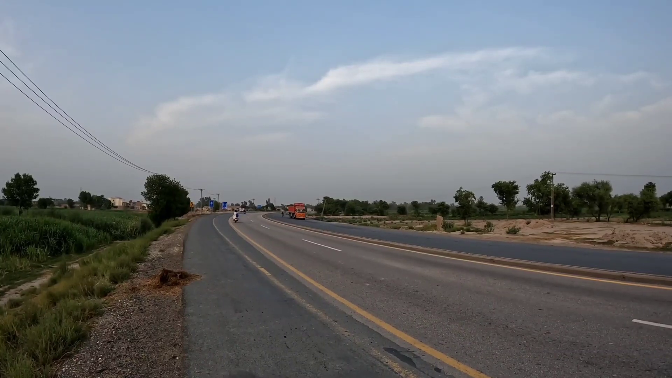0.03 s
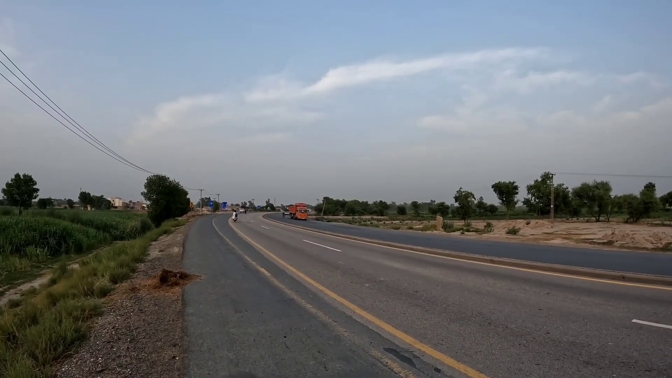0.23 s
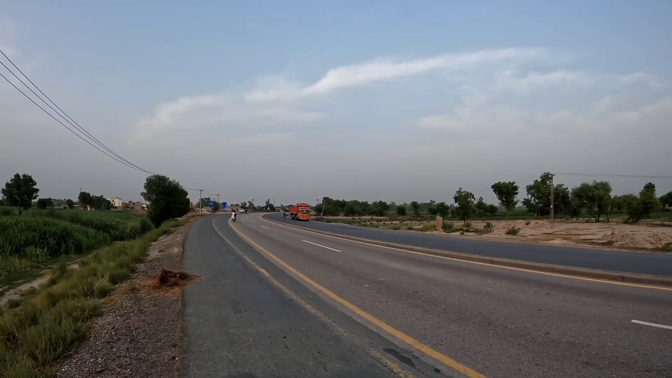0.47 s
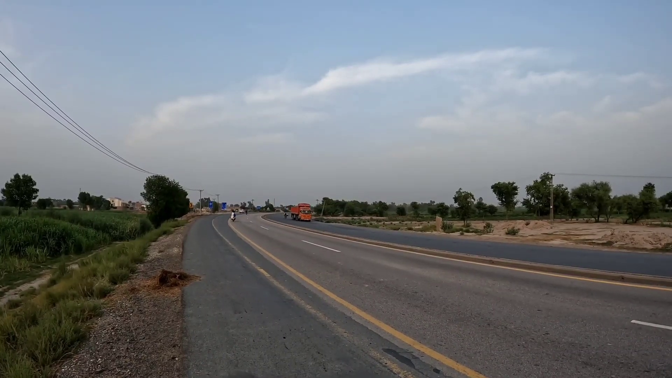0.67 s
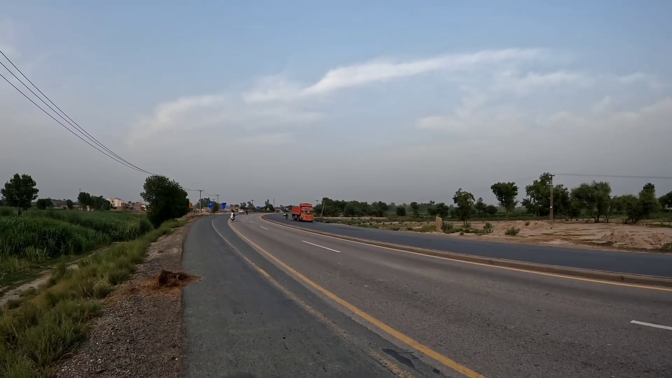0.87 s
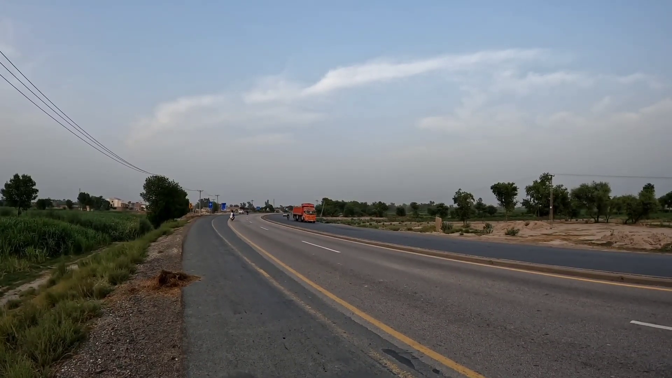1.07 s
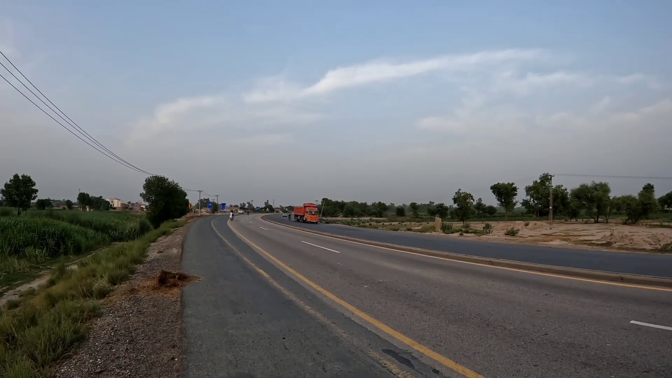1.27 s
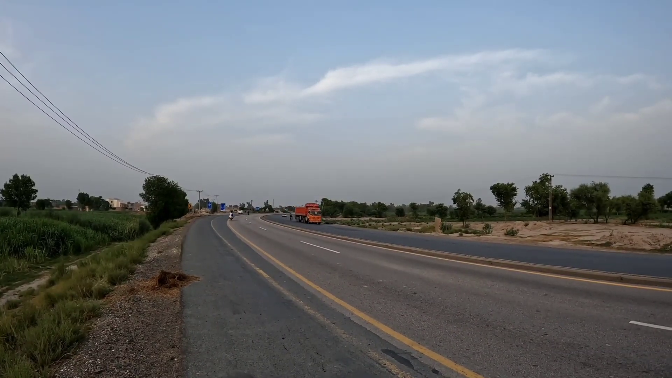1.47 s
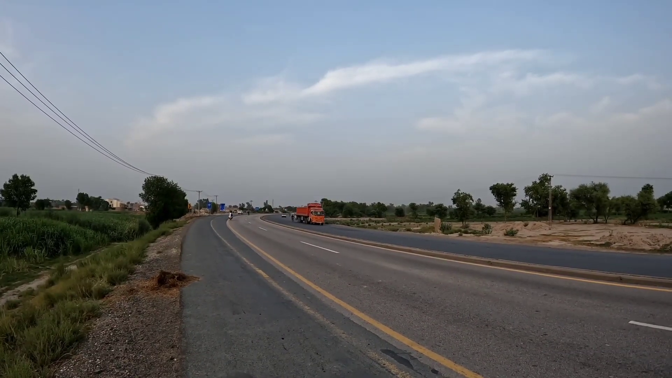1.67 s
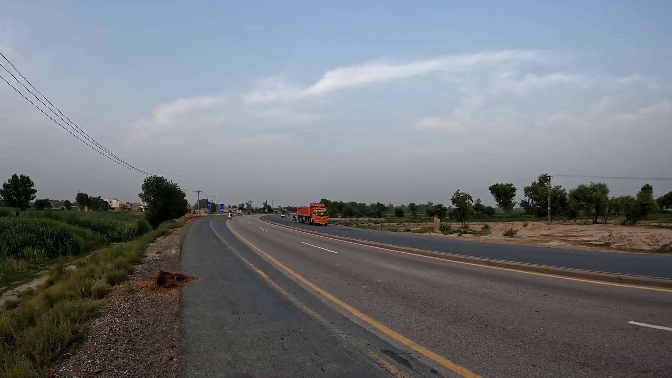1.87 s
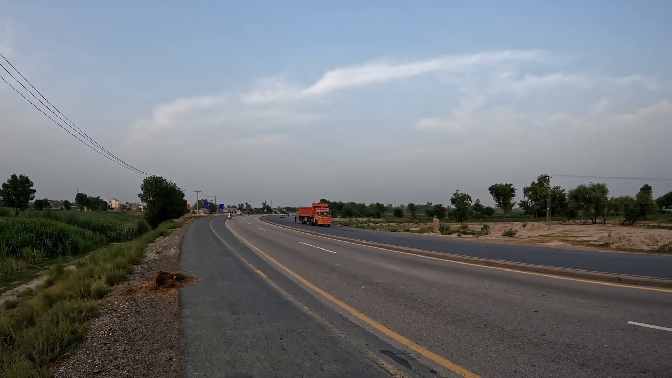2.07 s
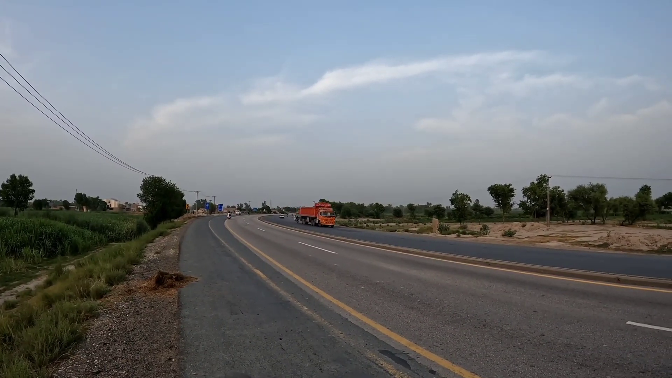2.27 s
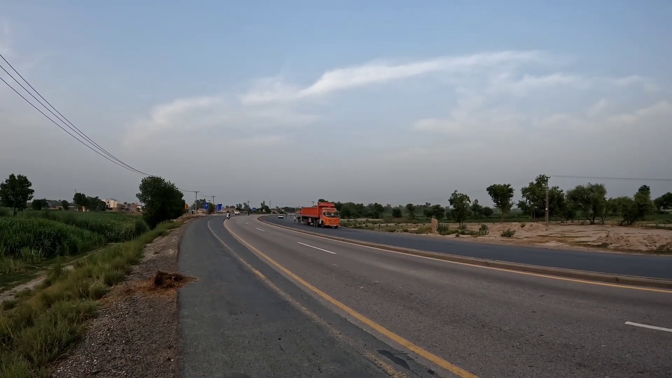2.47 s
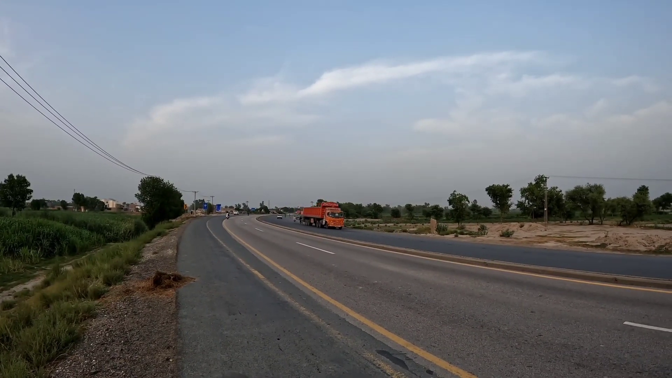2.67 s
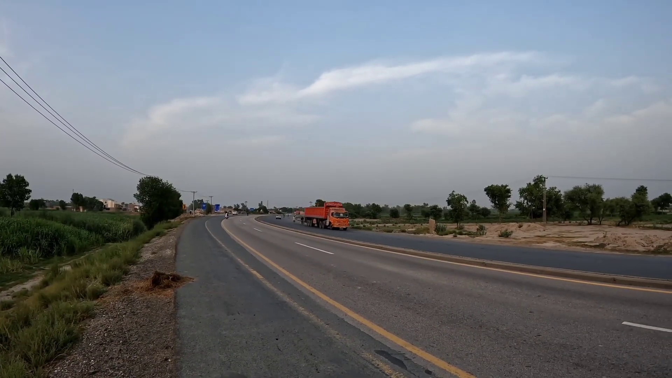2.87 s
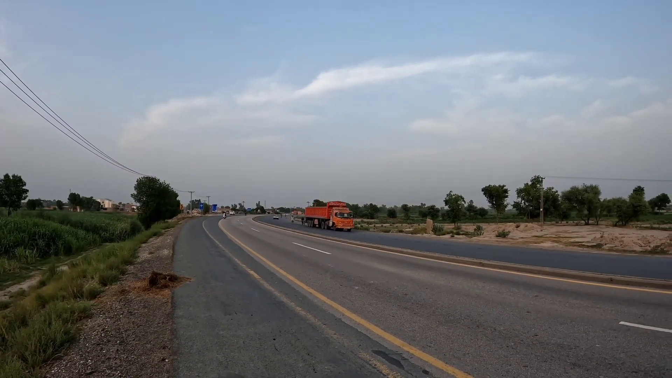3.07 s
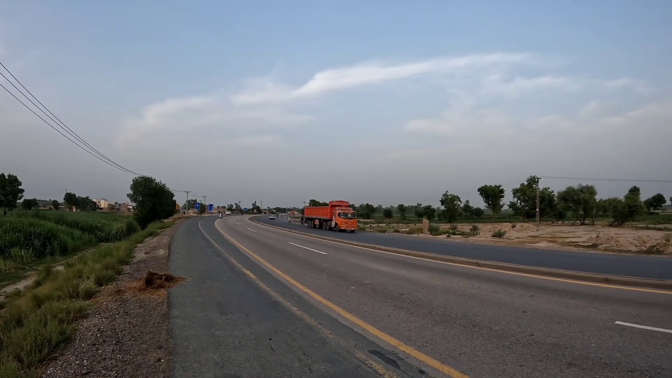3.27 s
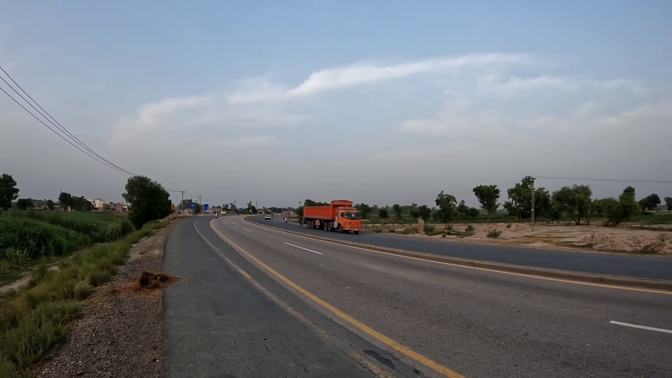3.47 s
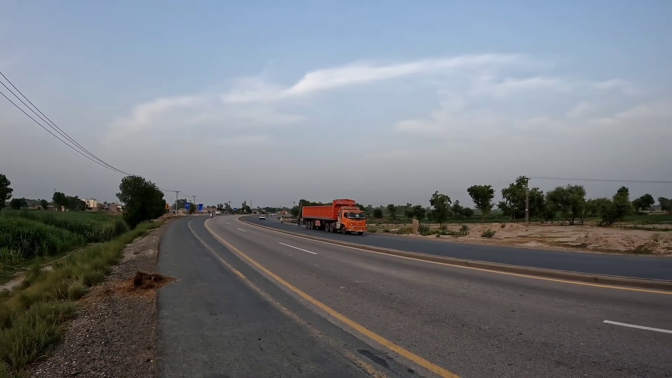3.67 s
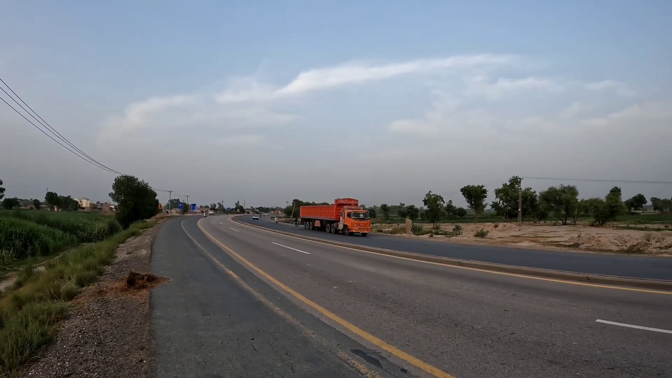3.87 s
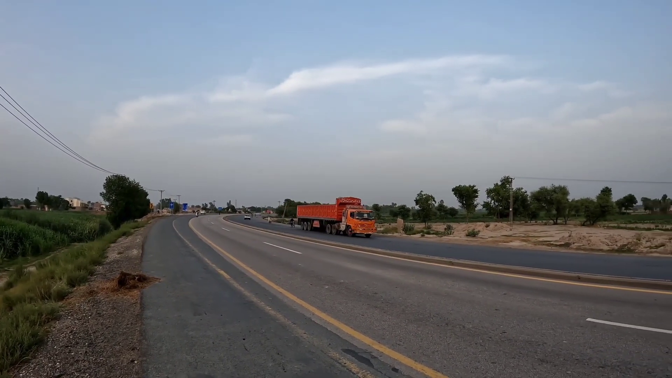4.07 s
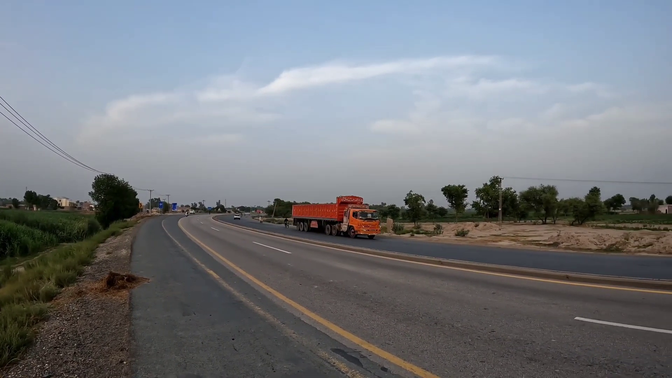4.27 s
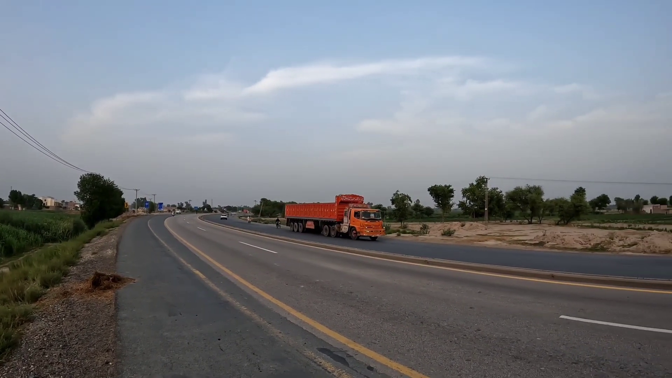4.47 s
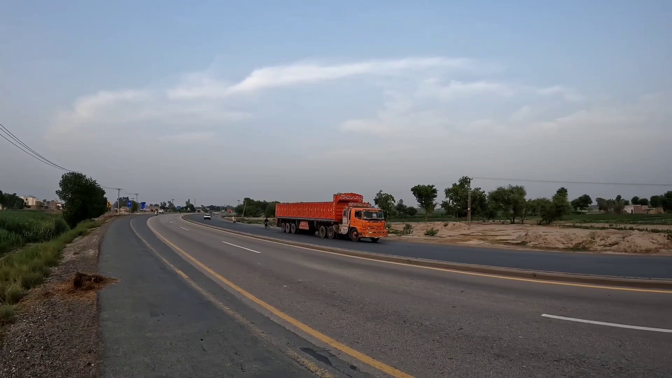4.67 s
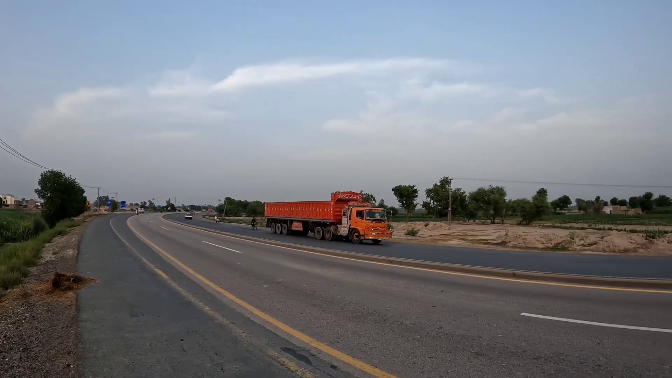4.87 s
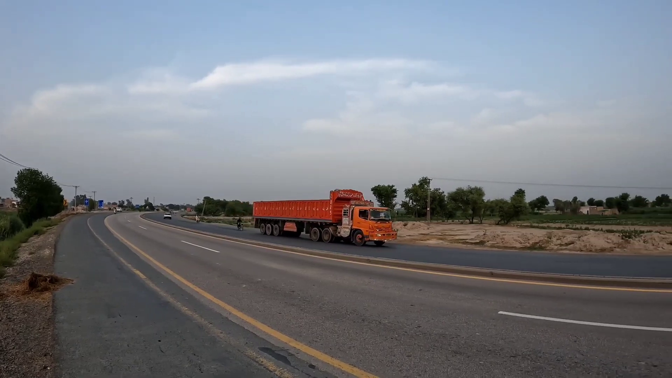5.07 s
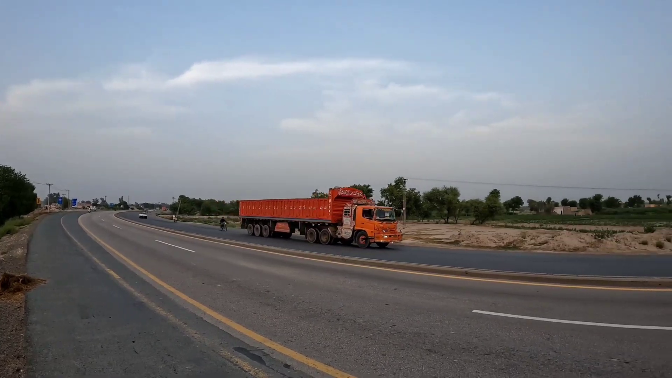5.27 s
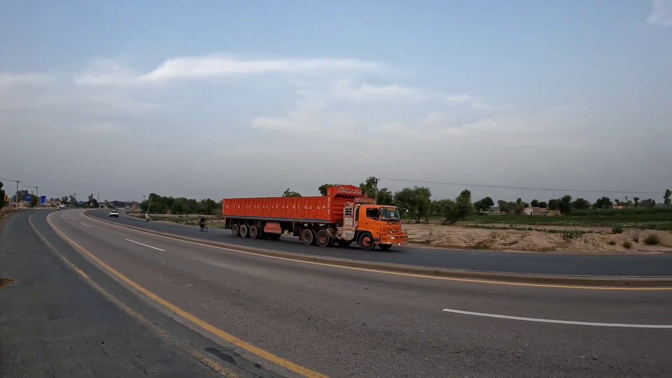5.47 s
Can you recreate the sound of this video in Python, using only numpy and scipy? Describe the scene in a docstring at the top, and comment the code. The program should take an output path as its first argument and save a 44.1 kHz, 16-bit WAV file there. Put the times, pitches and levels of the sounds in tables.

```python
"""A heavy diesel truck with a long trailer approaches on an open highway, heard from the shoulder.
Its exhaust rumbles in sine overtones and coloured noise; its tyres roar louder in grained noise, with a
hiss that swells and ebbs. The hollow trailer drums in narrow noise, its loose steel rattles, clinks
(struck resonances) and squeaks. At first a second engine drones farther off in a few sines, and a
diesel knock ticks in short noise bursts through the noise of distant traffic."""
import sys
import numpy as np
from scipy import signal
from scipy.fft import rfft, irfft, next_fast_len
from scipy.io import wavfile
from scipy.ndimage import uniform_filter1d

SR = 44100
rng = np.random.default_rng(int(sys.argv[2]) if len(sys.argv) > 2 else 0)


def transcribe(signal):
    """Save signal, clipped to [-1, 1], as a 16-bit WAV file at the path in sys.argv[1]."""
    frames = np.atleast_2d(signal).T
    limited = np.clip(frames, -1, 1)
    pcm = np.round(limited * 32767).astype(np.int16)
    wavfile.write(sys.argv[1], SR, pcm)


N = 243873  # length in samples

# Near engine. Exhaust opening up as the truck rounds the bend: time_s, rumble_db (before trim)
EXHAUST = [(0, -31.5), (.6, -33), (1.7, -30.5), (1.95, -26.5), (2.85, -26.5), (3.7, -24), (4.3, -22),
           (4.78, -21), (4.92, -26.5), (5.53, -23.5)]
# Growl, peaking facing the listener and again up close: time_s, level_db
GROWL = [(0, -42.5), (1.7, -41), (2.05, -38), (2.85, -34.5), (3.4, -35.5), (4.65, -32.5), (5.1, -35),
         (5.53, -34)]
# Exhaust overtones, each standing out for a while: firing_rate_multiple, level_db (relative), loudest_s, rise_db
ENGINE_ORDERS = [(2, -6, 2.98, 10), (2.32, -9, 4.78, 5), (2.55, -11, 4.25, 8), (2.67, -13, 3.2, 9),
                 (2.75, -12, 4.55, 9), (3.5, -8, 5.3, 7), (4.65, -17, 4.6, 4)]
# Colours of the boom, rumble and growl: freq_hz, level_db (relative)
BOOM_COLOUR = [(10, -17), (17, -5), (24, 0.5), (28, 4), (33, -0.5), (43, 4), (60, 1.5), (85, 1.5),
               (130, -25.5), (300, -86)]
RUMBLE_COLOUR = [(35, -15), (65, -3.5), (95, 0), (122, -3.5), (140, -2), (170, -1), (205, -3), (238, -8.5),
                 (275, -9.5), (350, -18), (500, -31.5), (1500, -95)]
GROWL_COLOUR = [(200, -14), (400, -3.5), (490, 0.5), (570, 2), (670, 1.5), (800, -6), (1100, -17),
                (2500, -25), (7000, -65)]
FIRING_HZ, ORDER_SWELL_S = 66.4, 0.32
# Layer levels up close, and the share of the tyre roar's swing that each follows
FIRING_DB, FIRING_FOLLOWS = -29.5, 0.44
BOOM_DB, BOOM_FOLLOWS = -30.5, 0.28
OVERTONE_DB, OVERTONE_FOLLOWS = -25.5, 0.99  # these follow the exhaust rumble instead


def engine(waver=0.00565, tone_rough_db=1.5, pulse_db=0.5, rumble_db=0.77):
    """Firings give exhaust tones, a deep boom, a rough rumble and a growl pulsing at the firing rate."""
    near_db, exhaust_db = nearness(), in_time(EXHAUST)[0]
    boom_rise_db, rumble_rise_db = swells()
    turn = 2 * np.pi * np.cumsum(FIRING_HZ * (1 + waver * drift(2.66))) / SR
    firing = from_db(FIRING_DB + FIRING_FOLLOWS * near_db) * np.sin(turn)

    orders = 0
    for multiple, db, loudest_s, rise_db in ENGINE_ORDERS:
        order_db = db + rise_db * bell(loudest_s, ORDER_SWELL_S) + tone_rough_db * drift(1.6)
        orders = orders + from_db(order_db) * np.sin(multiple * turn + rng.uniform(0, 2 * np.pi))
    overtone_db = OVERTONE_DB + OVERTONE_FOLLOWS * (exhaust_db - exhaust_db.max())
    overtones = from_db(overtone_db) * orders

    boom_db = BOOM_DB + BOOM_FOLLOWS * near_db + boom_rise_db
    boom = from_db(boom_db) * evened(rush(BOOM_COLOUR), span_s=0.091)
    rumble_level = from_db(exhaust_db + rumble_db + rumble_rise_db)
    rumble = rumble_level * evened(rush(RUMBLE_COLOUR), span_s=0.088)
    pulses = from_db(pulse_db * np.sin(turn))
    growl = from_db(in_time(GROWL)[0]) * evened(rush(GROWL_COLOUR, pulses), span_s=0.32)
    return firing + overtones + boom + rumble + growl


# Swells and dips of the deep boom, the rumble at times with it: peak_s, boom_rise_db, rumble_rise_db
SWELLS = [(2.02, 9, 1), (2.45, 6, 0), (2.88, 6.5, 0), (3.14, -3, 2), (3.27, 6, 1), (3.79, 8, 1),
          (4.03, 8, -0.5), (4.22, 5, 1.5), (4.53, -9, 0), (4.92, 5.5, 2.5), (5.21, 10, -1)]
SWELL_S = 0.073


def swells():
    """Bell-shaped rises, or dips, of the boom and of the rumble, in dB."""
    return sum(np.outer(rises_db, bell(s, SWELL_S)) for s, *rises_db in SWELLS)


# Tyre noise along the approach: time_s, roar_db (before trim), hiss_db
APPROACH = [(0, -45.5, -48.5), (.08, -45.5, -50), (.18, -46.5, -49.5), (.7, -48.5, -53), (1.6, -47, -51),
            (1.88, -47, -47), (1.96, -44.5, -44.5), (2.71, -40.5, -45), (2.77, -39.5, -41),
            (2.86, -39.5, -41.5), (3.25, -39, -41), (3.7, -37.5, -42), (4.3, -36.5, -37.5),
            (4.38, -35.5, -34.5), (4.45, -34, -38.5), (4.62, -34.5, -35.5), (4.95, -35, -41.5),
            (5.53, -33.5, -40.5)]
# Colours of the roar and of the tread hiss: freq_hz, level_db (relative)
TYRE_COLOUR = [(350, -13), (700, -13), (850, -4), (1000, -2), (1300, -3), (1600, -8.5), (2400, -13),
               (5000, -52.5)]
TREAD_COLOUR = [(1000, -11), (1650, -7.5), (2100, -3.5), (2800, -3.5), (3400, -8), (5000, -13), (7500, -26),
                (14000, -69.5)]


def tyres(roar_db=1.5, hiss_db=0, grain_db=1.1, roar_grain=0.55):
    """Tread on coarse asphalt: a roar with a more strongly grained hiss above it."""
    roar_level, hiss_level = in_time(APPROACH)
    asphalt = from_db(grain_db * drift(57))
    roar = from_db(roar_level + roar_db) * rush(TYRE_COLOUR, asphalt ** roar_grain)
    hiss = from_db(hiss_level + hiss_db) * rush(TREAD_COLOUR, asphalt)
    return roar + hiss


def nearness():
    """Tyre roar in dB relative to its average over the last second, the truck's close level."""
    roar_db = in_time(APPROACH)[0]
    return roar_db - roar_db[-SR:].mean()


# Shaking of the trailer, hardest on a rough stretch of road: time_s, level_db (relative, before sway)
SHAKE = [(0, -29.5), (.9, -23.5), (1.8, -21), (2.45, -17), (2.71, -10), (2.78, -7.5), (3.88, -6.5),
         (3.98, -1), (4.28, -1.5), (4.4, 0.5), (4.8, 4), (4.9, 0.5), (5.53, -4)]
# Loose steel striking the trailer: start_s, clash_db, clank_db (relative, before trims)
CLINKS = [(1.895, -66, -53), (1.945, -55, -58), (2.125, -58, -60), (2.495, -52, -51), (2.745, -63, -58),
          (3.06, -59, -55.5), (3.175, -50, -55), (3.365, -56, -58), (3.53, -49, -52), (3.945, -52, -38),
          (4.168, -43, -37), (4.32, -48, -40), (4.365, -52, -34), (4.476, -38, -36), (4.605, -48, -51),
          (4.657, -54, -36), (4.718, -61, -29.5), (4.785, -46, -53), (4.94, -54, -54), (5.171, -46, -46),
          (5.256, -47, -52)]
# Colours of the coarse rattle and the fine sizzle: freq_hz, level_db (relative)
RATTLE_COLOUR = [(1200, -18), (2500, 1), (3400, 0), (4100, 3), (4800, -1), (5400, -15.5), (6500, -20),
                 (8000, -23.5), (15000, -72.5)]
SIZZLE_COLOUR = [(3000, -9), (5000, 0), (5900, 0.5), (6800, -3), (7800, -7.5), (8200, -17), (10000, -17.5),
                 (12000, -22), (14000, -38)]
# Ring of the loose steel: pitch_hz, level_db (relative), t60_s
CLANK = [(3815, -2, .09), (4000, -2, .07), (4200, -9, .06), (4780, -10, .06)]
RATTLE_DB, RATTLE_FOLLOWS, SIZZLE_DB = -45.5, 0.66, -48  # at 0 dB of shaking; the rattle swings less
JOLT_RISE_S = 0.0067


def trailer(grain_db=2, sway_db=-1.1, clash_db=-2, spray_db=-4, clank_db=-1):
    """The road shakes the body into a dense rattle; bigger jolts make loose steel clash, sizzle and ring."""
    shake_db = in_time(SHAKE)[0] + sway_db * drift(3.7)
    contacts = from_db(grain_db * drift(90))
    start_s, clash_level, clank_level = np.transpose(CLINKS)
    rise = max(int(JOLT_RISE_S * SR), 2)
    # each jolt is spread over its short rise
    jolts = uniform_filter1d(clicks(start_s + JOLT_RISE_S / 2, clash_level), rise)
    rattle = from_db(RATTLE_DB + RATTLE_FOLLOWS * shake_db) + from_db(clash_db) * dying(jolts, t60=0.24)
    sizzle = from_db(SIZZLE_DB + shake_db) + from_db(spray_db) * dying(jolts, t60=0.19)
    body = rattle * rush(RATTLE_COLOUR, contacts) + sizzle * rush(SIZZLE_COLOUR, contacts)
    return body + steel(CLANK, start_s, clank_level + clank_db) + squeaks()


def steel(modes, times, db, bounce_s=0.013, count=2):
    """A loose piece strikes, bounces more softly and rings in its modes."""
    delays = rng.uniform(0, bounce_s, (len(times), count))
    bounces = sum(clicks(times + delay, db - 9) for delay in delays.T)
    blows = clicks(times, db) + bounces
    rings = sum(from_db(level) * ring(blows, hz, t60) for hz, level, t60 in modes)
    # small, distant pieces lack bass and top
    band = signal.butter(2, [3000, 8000], "band", fs=SR, output="sos")
    return signal.sosfilt(band, rings)


# Steel joints rubbing: loudest_s, length_s, pitch_hz, glide_hz, level_db (before trim)
SQUEAKS = [(1.912, .05, 4500, 0, -56), (2.525, .04, 4490, 0, -60), (3.07, .06, 4490, 0, -52),
           (3.21, .06, 4800, 0, -51.5), (3.255, .11, 4490, 0, -49.5), (3.45, .14, 2965, -30, -49.5),
           (3.957, .025, 3960, 0, -47), (3.986, .03, 4020, 0, -44.5), (4.192, .035, 4200, 0, -42),
           (4.203, .04, 4000, -60, -43), (4.335, .055, 4490, 0, -44), (4.374, .045, 3870, -300, -39.5),
           (4.452, .075, 4490, 0, -38), (4.486, .02, 3540, 0, -41), (4.502, .025, 4490, 0, -43),
           (4.513, .025, 4060, 0, -43), (4.596, .03, 4790, 0, -42.5), (4.668, .035, 3820, 60, -41),
           (4.672, .035, 4020, 0, -44), (4.736, .06, 4490, 0, -40.5), (4.731, .055, 3815, 0, -42),
           (5.181, .025, 4150, 0, -45), (5.197, .025, 4000, 0, -48), (5.263, .06, 4490, 0, -46.5)]
SQUEAK_DB, SQUEAK_WAVER_HZ, SQUEAK_ROUGH_DB = -1.8, 22, 2


def squeaks(upper_ratio=2.412, upper_db=-30):
    """Friction swells a joint's note, may bend it, and lets it go; slips roughen it, a faint upper mode joins."""
    t, out = np.arange(N) / SR, np.zeros(N)
    slip_hz = SQUEAK_WAVER_HZ * drift(70)
    grip = from_db(SQUEAK_DB + SQUEAK_ROUGH_DB * drift(80))
    for loudest_s, length_s, hz, glide_hz, db in SQUEAKS:
        on = np.abs(t - loudest_s) < length_s / 2
        stroke = (t[on] - loudest_s) / length_s  # -0.5 to 0.5
        turn = 2 * np.pi * np.cumsum(hz + glide_hz * stroke + slip_hz[on]) / SR
        note = np.sin(turn) + from_db(upper_db) * np.sin(upper_ratio * turn)
        out[on] += from_db(db) * np.cos(np.pi * stroke) * note
    return np.sqrt(2) * grip * out


# The hollow trailer drumming: loudest_s, length_s, pitch_hz, level_db
DRUMMING = [(1.957, 0.12, 108, -28.5), (1.935, 0.18, 166, -26), (2.152, 0.41, 204.5, -28.5),
            (2.55, 0.53, 161.5, -29), (3.054, 0.13, 217.6, -28), (3.293, 0.13, 109, -23),
            (3.953, 0.095, 158, -24), (4.24, 0.16, 62.8, -25), (4.53, 0.12, 222, -27.5),
            (4.658, 0.13, 117.6, -26.5), (4.76, 0.15, 154, -22), (5.185, .12, 159, -24),
            (5.248, .35, 117.5, -28.5)]


def drumming(width=0.13):
    """Now and then the hollow trailer booms briefly: noise in a narrow resonance around one low note."""
    out = 0
    for loudest_s, length_s, hz, db in DRUMMING:
        low_hz, high_hz = hz * (1 - width) ** 2, hz / (1 - width) ** 2
        resonance = [(low_hz, -40), (hz, 0), (high_hz, -40), (hz * 4, -100)]
        note = rms_one(colour(rng.standard_normal(N), resonance))
        out = out + from_db(db) * bell(loudest_s, length_s / 2) * evened(note[None], span_s=0.028)
    return out


# The far engine fading away: time_s, level_db
DRONE = [(0, -30.5), (1.1, -31), (1.9, -32.5), (2.6, -36), (3.4, -37), (5.53, -62.5)]
# Its firing tone and overtones: firing_rate_multiple, level_db (relative)
DRONE_ORDERS = [(1, -2.5), (2.451, -13), (2.85, -18.5), (4.5, -14)]
DRONE_HZ = 54.26


def far_engine(waver=0.002, flutter_db=-0.5, overtone_flutter_db=4.0):
    """A nearly steady firing tone and a few wavering overtones carry from far away."""
    turn = 2 * np.pi * np.cumsum(DRONE_HZ * (1 + waver * drift(2.7))) / SR
    tones = 0
    for multiple, db in DRONE_ORDERS:
        depth_db = overtone_flutter_db if multiple > 1 else flutter_db
        tones = tones + from_db(db + depth_db * drift(2.2)) * np.sin(multiple * turn)
    return np.sqrt(2) * from_db(in_time(DRONE)[0]) * tones


# Hardest diesel knocks: start_s, level_db (before trim and colour)
KNOCKS = [(0.649, -37), (0.6752, -42), (0.7008, -42), (0.7272, -42), (0.7542, -44), (1.0984, -41),
          (1.1245, -43), (1.1515, -38), (1.1787, -41), (1.2052, -42.5), (1.3915, -43), (1.497, -42),
          (1.6028, -33), (1.7085, -40), (1.7612, -33.8), (1.8926, -40), (1.9205, -38), (2.1305, -33)]
# The evenly spaced knock running throughout, under the hard ones: time_s, level_db (before scatter, trim, colour)
KNOCKING = [(0, -49), (.6, -47), (1.2, -44.5), (2, -41.5), (2.6, -37), (5.53, -64)]
# Colour of a knock: freq_hz, level_db (relative)
KNOCK_COLOUR = [(1500, -14), (2900, -2), (3500, -4.5), (4100, 8), (4700, -14), (5500, -17.5), (6200, -7),
                (7200, -38.5), (9000, -40.5), (14000, -58)]
KNOCK_PERIOD_S, HARD_KNOCK_DB = 0.0265, -1


def diesel_knock(uneven_db=7.0, steady_db=-2, t60=0.015):
    """Evenly spaced combustion knocks of uneven strength, and some hard ones, each a dry burst."""
    hard_s, peak_db = np.transpose(KNOCKS)
    beat_s = np.arange(hard_s[0] % KNOCK_PERIOD_S, N / SR, KNOCK_PERIOD_S)
    scatter_db = uneven_db * rng.uniform(-0.83, 1, len(beat_s))
    beat_db = np.interp(beat_s, *np.transpose(KNOCKING)) + scatter_db
    blows = clicks(hard_s, peak_db + HARD_KNOCK_DB) + clicks(beat_s, beat_db + steady_db)
    bursts = dying(blows, t60) * evened(rush(KNOCK_COLOUR), span_s=0.003)
    return colour(bursts, [(7000, -6.0), (9000, -21)])  # the air dulls each crack


# Traffic farther down the road: time_s, level_db
TRAFFIC = [(0, -34), (.5, -42.5), (1.35, -40), (1.85, -51.5), (2.4, -50.5), (5.53, -58)]
# Its colour: freq_hz, level_db (relative)
TRAFFIC_COLOUR = [(150, -25), (210, -3), (243, 5.5), (280, -15), (310, -1.5), (390, -16.5), (560, -9.5),
                  (800, -28.5), (1400, -30), (2500, -24), (6000, -73)]


def distant_traffic():
    """Traffic down the road merges into one coloured noise."""
    return from_db(in_time(TRAFFIC)[0]) * rush(TRAFFIC_COLOUR)


# Stereo width by frequency: freq_hz, side_minus_mid_db (before the side level over time)
WIDTH = [(30, -38), (90, -55), (200, -64), (380, -14.5), (620, -29), (850, -24.5), (1500, -20),
         (4400, -18.5), (6000, -13.5), (8500, -10), (13000, -7)]
# Stereo side level over time, almost mono at first, opening around 2 s: time_s, side_db
SIDE_LEVEL = [(0, -53), (1.6, -42.5), (2.05, -11.5), (2.6, -3.5), (3.2, -1), (4.3, 2), (5.53, 2)]


def rush(spectrum, flutter=1):
    """Stereo turbulence driven by a flutter, its side level set by frequency and over time; rms 1."""
    mid, side = colour(rng.standard_normal((2, N)) * flutter, spectrum)
    side = colour(side, WIDTH) * from_db(in_time(SIDE_LEVEL)[0])
    return rms_one(mid + side * [[1], [-1]])


# Phase lead of the right channel: freq_hz, right_lead_rad (negative lags; before the side level over time)
RIGHT_LEADS = [(300, 0), (520, -.1), (800, 0.16), (2100, .13), (2600, .33), (7500, .24), (10000, .05)]


def from_the_right(x):
    """A small phase lead by frequency, mostly to the right ear, grows with the side level over time."""
    size = next_fast_len(N)
    hz, lead = np.transpose(RIGHT_LEADS)
    phase = np.interp(np.fft.rfftfreq(size, 1 / SR), hz, lead)
    # a small quarter-turned part, added left and subtracted right, shifts the phase
    side = irfft(rfft(x.mean(axis=0), size) * -.5j * phase, size)[:N]
    return x + np.array([[1], [-1]]) * side * from_db(in_time(SIDE_LEVEL)[0])


def from_db(db):
    """Decibels to gain."""
    return 10 ** (np.asarray(db) / 20)


def rms_one(x):
    """Scale to unit power."""
    return x / np.sqrt(np.mean(x ** 2) + 1e-20)


def in_time(rows):
    """Each column of a curve, sample by sample."""
    s, *columns = np.transpose(rows)
    return [np.interp(np.arange(N) / SR, s, c) for c in columns]


def bell(s, width_s):
    """A smooth bump of height 1 around a moment."""
    return np.exp(-((np.arange(N) / SR - s) / width_s) ** 2)


def drift(rate_hz):
    """Smooth random wander with spread 1, drawn every 40 samples and joined by lines."""
    r = np.exp(-80 * np.pi * rate_hz / SR)
    noise = rng.standard_normal(N // 40 + 2002)
    slow = signal.lfilter([1], [1, -2 * r, r * r], noise)[2000:]  # drop the settling
    return np.interp(np.arange(N) / 40, np.arange(len(slow)), rms_one(slow))


def colour(x, spectrum):
    """Filter by a spectrum drawn on a log-frequency axis."""
    size = next_fast_len(N)
    hz, db = np.transpose(spectrum)
    bins = np.maximum(np.fft.rfftfreq(size, 1 / SR), 1)
    gain = from_db(np.interp(np.log(bins), np.log(hz), db))
    return irfft(rfft(x, size) * gain, size)[..., :N]


def evened(x, span_s):
    """Hold the power of a sound steady over a short span."""
    power = uniform_filter1d(np.mean(x ** 2, axis=0), max(int(span_s * SR), 2))
    return x / np.sqrt(np.abs(power) + 1e-9)


def clicks(times, db):
    """One impulse for each blow."""
    out = np.zeros(N)
    at = np.round(np.asarray(times) * SR).astype(int)
    out[np.clip(at, 0, N - 1)] = from_db(db)
    return out


def dying(blows, t60):
    """An envelope that jumps at each blow and dies away by 60 dB in t60 seconds."""
    return signal.lfilter([1], [1, -from_db(-60 / (t60 * SR))], blows + 1e-18)


def ring(force, hz, t60):
    """A two-pole resonator: a unit click starts a decaying sine of height 1."""
    r, w = from_db(-60 / (t60 * SR)), 2 * np.pi * hz / SR
    return signal.lfilter([0, np.sin(w)], [1, -2 * r * np.cos(w), r * r], force + 1e-18)


def scene(tyre_pan_db=-0.33, trailer_pan_db=0.5):
    """Everything starts nearly straight ahead, over open ground; the image opens around 2 s."""
    sides = np.array([[1], [-1]]) * from_db(in_time(SIDE_LEVEL)[0])
    road = tyres() * from_db(tyre_pan_db * sides) + trailer() * from_db(trailer_pan_db * sides)
    return from_the_right(engine() + road + drumming() + far_engine() + diesel_knock() + distant_traffic())


CUTOFF_HZ = 14100


def record(dry, fade_s=0.0015):
    """The sound fades in and out within a few milliseconds; the top is cut steeply."""
    t = np.arange(N) / SR
    fade = np.sin(np.pi / 2 * np.clip(np.minimum(t, t[::-1]) / fade_s, 0, 1)) ** 2
    low_pass = signal.ellip(10, .1, 80, CUTOFF_HZ, fs=SR, output="sos")
    return signal.sosfilt(low_pass, dry * fade)


dry = scene()
out = record(dry)
transcribe(out)
```